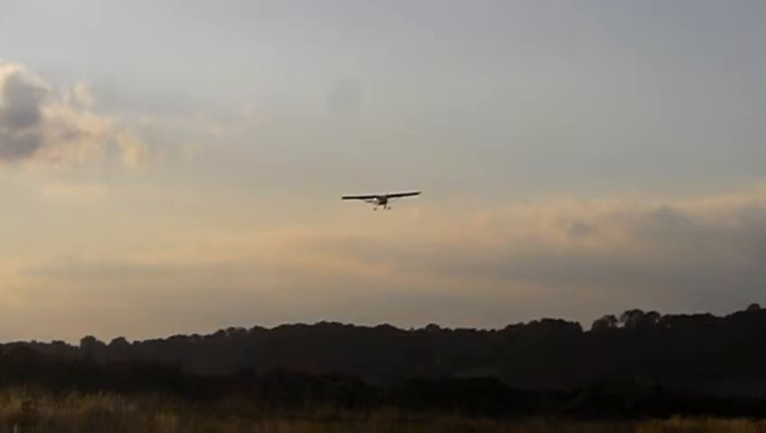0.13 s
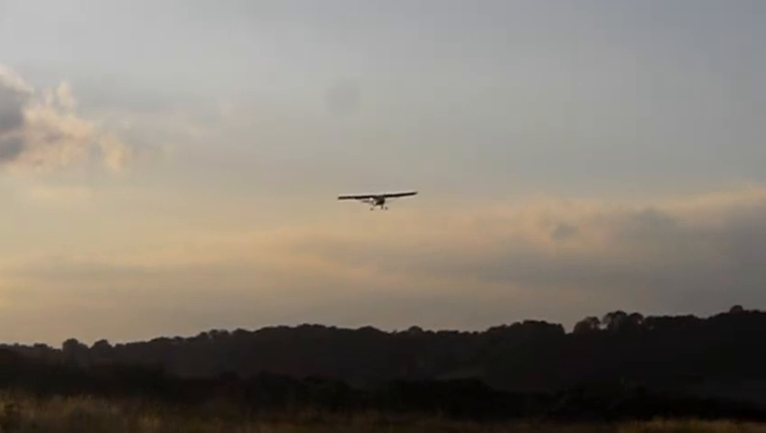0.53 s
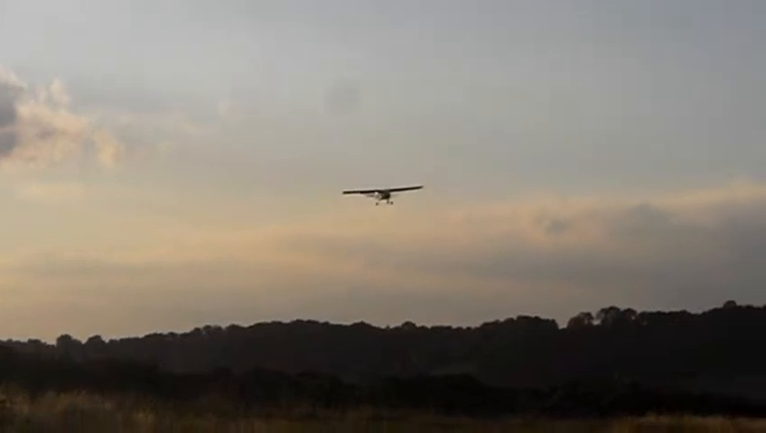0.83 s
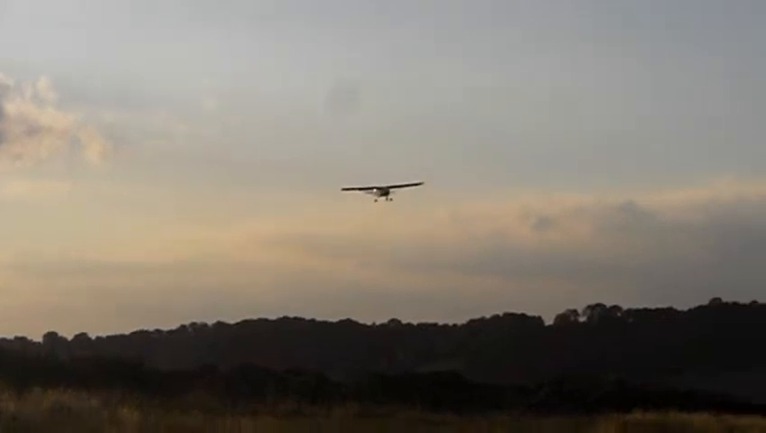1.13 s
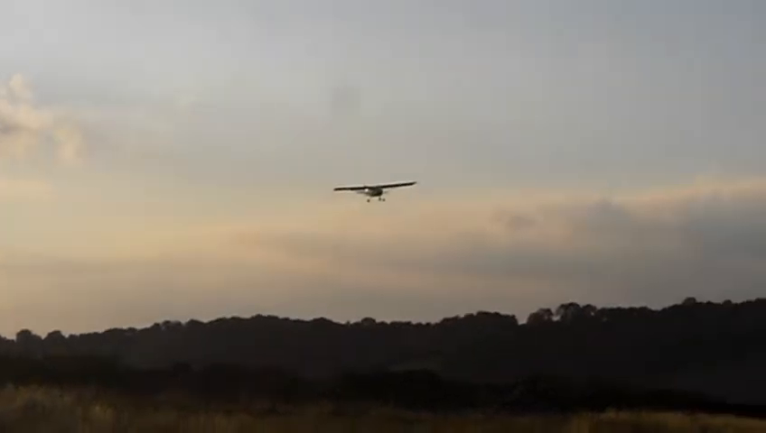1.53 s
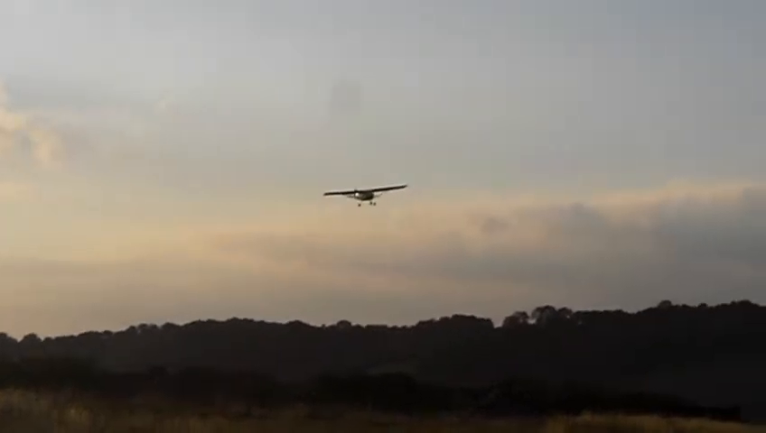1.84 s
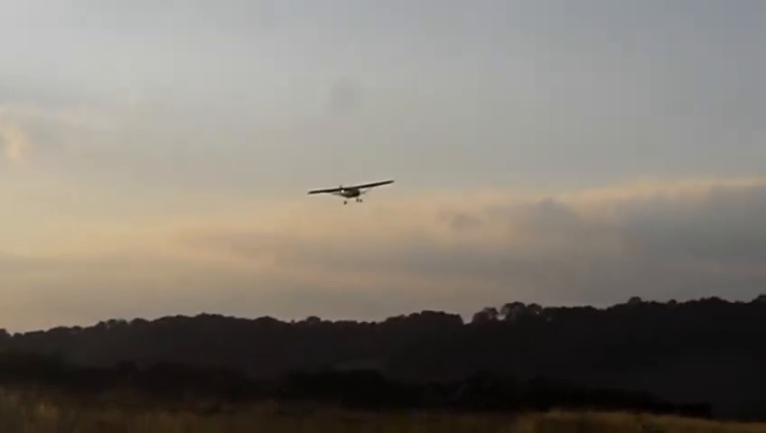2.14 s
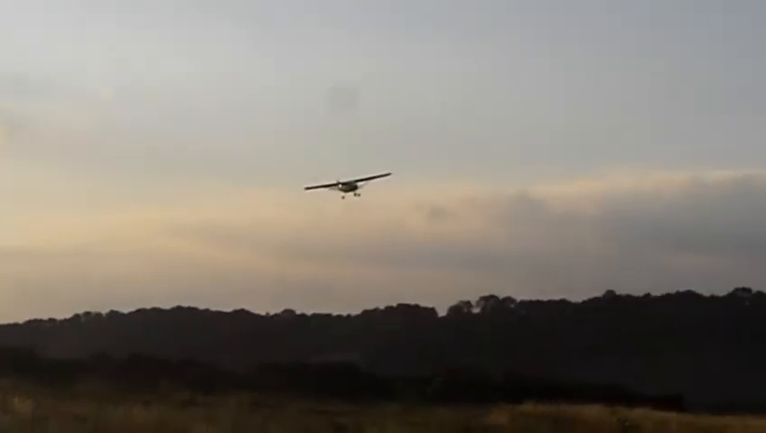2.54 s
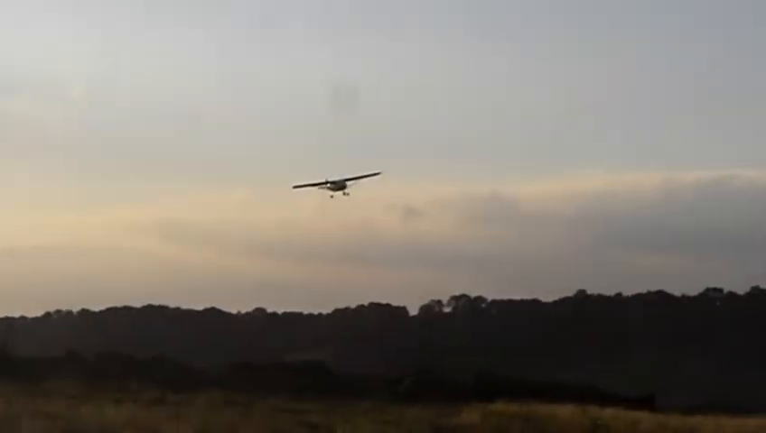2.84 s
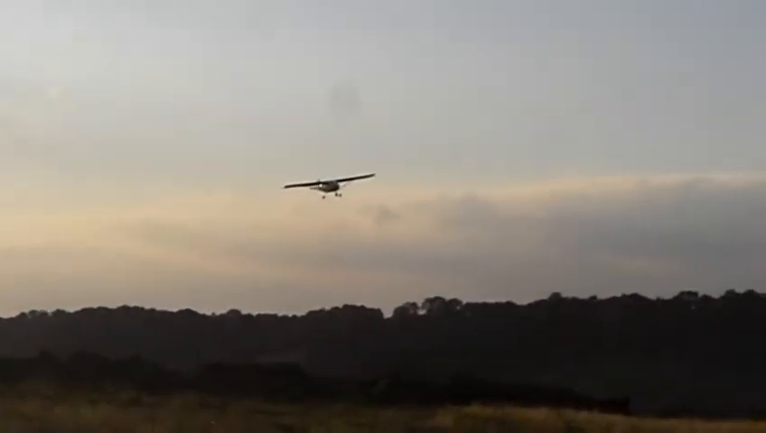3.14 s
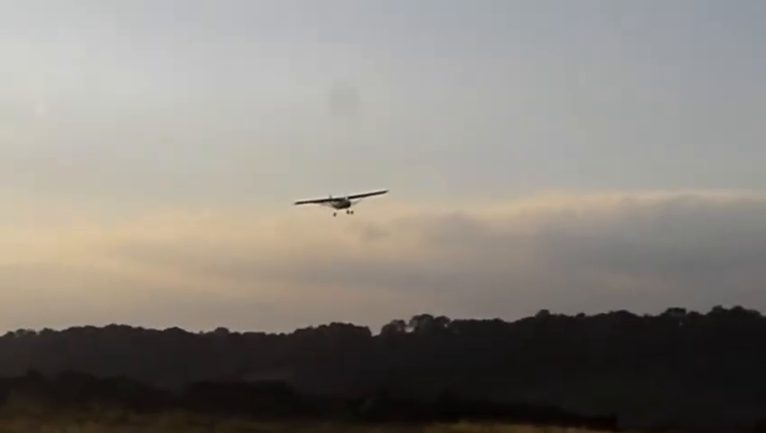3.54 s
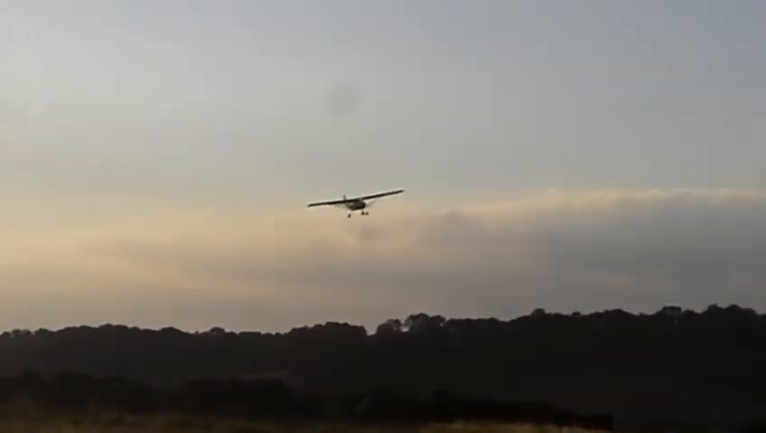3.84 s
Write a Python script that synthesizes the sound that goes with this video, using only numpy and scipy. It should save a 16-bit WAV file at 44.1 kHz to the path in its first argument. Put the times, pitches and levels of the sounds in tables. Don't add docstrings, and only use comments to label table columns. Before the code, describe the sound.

A small propeller plane drones over an open field. After 0.17 s of silence its raspy, buzzing engine and propeller hum fade in until 0.7 s, wavering in tone, swelling to loudest near 2.7 s. Pitch sags slightly at 3 s, then rises as the level eases. Low wind thumps hit the bare microphone around 0.3-0.9, 1.3-1.6, 2-2.7 and hardest 3.2-3.6 s, over breeze, hiss and faint insect ticks.

```python
import sys
import numpy as np
from scipy import signal
from scipy.fft import rfft, irfft
from scipy.io import wavfile
from scipy.ndimage import uniform_filter1d

SR = 44100
rng = np.random.default_rng(int(sys.argv[2]) if len(sys.argv) > 2 else 0)


def convert_level_to_amplitude(level_db):
    exponent = np.asarray(level_db, float) / 20
    return 10 ** exponent


def bounce(signal):
    frames = np.transpose(np.atleast_2d(signal))
    limited = np.clip(frames, -1, 1)
    pcm = np.round(limited * 32767).astype(np.int16)
    wavfile.write(sys.argv[1], SR, pcm)


N = 176400
T = np.arange(N) / SR

# (time [s], pitch of the 49th order of the engine cycle [Hz])
ENGINE_SPEED = [
    (.3, 1634),
    (.8, 1633),
    (1.5, 1633),
    (2.0, 1637),
    (2.6, 1633),
    (3.0, 1626),
    (3.55, 1642),
    (4.0, 1645),
]
# (time [s], level at the listener [dB])
FLIGHT_LEVEL = [
    (.3, -42),
    (.9, -46),
    (1.5, -44.5),
    (1.9, -42),
    (2.3, -38.5),
    (2.75, -38),
    (3.05, -42.5),
    (3.5, -41.5),
    (4.0, -44),
]
# (centre [Hz], width [Hz], even orders [dB], every second odd order [dB], noise [dB],
# level when facing away [dB])
PIPES = [(1055, 320, -13, -11, 15, -23), (1629, 145, -10, -3.5, -4, -7), (1935, 176, -1, 1.5, -4, -3.5),
         (3252, 293, -8, 0, 7, -1.5), (4010, 470, -14, 4, 8, -13), (1440, 170, 6, 3, 5, -5),
         (1767, 21, -14, 17, -18, -12), (1591, 30, 12, 0, -5, -23)]
# (outlet [index, rounded], level [dB], strongest at [s], length [s])
OUTLET_LOBES = [(0, 2.5, 1.55, 0.19), (0, 3, 2.89, 0.38), (0, 3, 3.91, 0.18), (1, 14.5, .97, 0.26),
                (1.5, 2, 3.73, 0.42), (1, -3.5, 2.32, .2), (1, 9, 1.81, 0.1), (1, 4, 2.86, 0.26),
                (2, 1, 1.06, 0.1), (2, 5, 2.16, 0.43), (2, 7.5, 4.23, 0.37), (2.5, -2, 1.5, 0.098),
                (3, 3, 2.77, 0.14), (3.5, -3.5, 2.16, 0.15), (4.5, -4, 1.61, 0.11), (4, -2.5, 2.77, 0.14),
                (5.5, 1.5, 1.71, 0.44), (5.5, -3.5, 3.66, 0.41), (7, 3, 1.72, 0.21), (6.5, 4.5, 2.7, 0.18),
                (7, 4.5, 2.73, 0.16), (2.5, -11, 0.27, 0.14), (3, -5, 1.06, 0.12)]
# (frequency [Hz], density [dB per Hz])
ROAR_SPECTRUM = [(250, -8.5), (700, -3), (1100, -5), (1750, -6), (2550, -12.5), (3290, -3.5), (4400, -16),
                 (6000, -44)]
# (multiple of blade rate [-], crank turns added [-], level [dB], strongest at [s], length [s])
BLADE_TONES = [(2, 0, 3, 2.28, 0.35), (2, 0, -5, 2.97, .25), (3, 0, -16, 0.44, .33), (4, 0, -3, .95, 0.32),
               (5, 0, -7, 1.9, .33), (6, 0, -1.5, 1.55, 0.71), (6, 1, -3.5, 1.15, 0.27),
               (7, 0, -1.5, 0.85, 0.56), (8, 0, -6, .8, 0.42), (10, 0, -2, 2.4, 0.37),
               (11, 0, -3.5, 3.01, 0.32), (11, 1, -5, 1.6, 0.35), (11, 1, -8, 3.1, .3),
               (11, 1, -6, 3.97, 0.22), (12, 0, -7, 2.7, .3), (12, 0, -6.5, 1.8, 0.42),
               (14, -1, -1.5, 1.62, 0.4), (14, -1, -4, 2.56, 0.18), (14, -1, -5.5, 3.8, 0.22),
               (14, 0, -4, 1.75, 0.51), (14, 0, -7, 2.9, .3), (16, 0, -4.5, 1.9, 0.23),
               (16, 0, -6.5, 3.69, 0.31), (17, 0, -5, 2.9, 0.43), (19, 0, -11.5, 0.77, 0.19),
               (6, 0, -2, 3.39, 0.37), (7, 0, -6, 2.83, .3)]
# (time [s], rumble level [dB])
GUST_LEVEL = [(0.2, -70), (0.37, -47), (0.43, -40), (0.75, -39), (0.94, -44), (1.09, -50), (1.3, -44),
              (1.46, -36.5), (1.81, -42), (2.08, -40.5), (2.25, -37), (2.55, -35.5), (2.78, -42),
              (2.93, -52), (3.19, -48), (3.34, -42.5), (3.83, -42.5), (4.0, -36)]
# (frequency [Hz], density [dB per Hz])
RUMBLE_SPECTRUM = [(15, 2), (40, 6.5), (100, -7), (200, -16), (350, -20), (500, -18.5), (1200, -54)]
# (frequency [Hz], density [dB per Hz])
BREEZE_SPECTRUM = [(20, -6), (60, 2), (130, -3), (250, -8.5), (450, -11), (800, -27)]
# (time [s], peak [dB], frequency [Hz])
THUMPS_SUCK = [(0.276, -21, 297), (0.294, -14.5, 210), (0.327, -15, 150), (0.351, -20.5, 144),
               (0.375, -17.5, 260), (0.59, -14, 185), (0.607, -24, 113), (0.617, -15.5, 159),
               (0.646, -11.5, 210), (0.663, -12, 245), (0.675, -19, 119), (0.729, -14, 140),
               (0.807, -23, 104), (0.905, -23.5, 121), (1.304, -21, 144), (1.318, -10.5, 156),
               (1.344, -24, 138), (1.387, -19.5, 114), (1.408, -19.5, 138), (1.425, -20, 123),
               (1.529, -20.5, 148), (1.592, -20, 144),
               (2.07, -23, 181), (2.119, -15, 126), (2.176, -9, 118), (2.305, -19.5, 283),
               (2.324, -16, 186), (2.354, -16, 120), (2.398, -18, 116.6), (2.424, -14, 151),
               (2.466, -19.5, 194), (2.535, -19, 122), (2.642, -18.5, 128), (2.659, -20, 135),
               (3.242, -16.5, 154), (3.272, -8.5, 196), (3.292, -13, 169), (3.31, -10.5, 186),
               (3.328, -8, 248), (3.347, -21.5, 103), (3.515, -39, 132), (3.54, -8.5, 241),
               (3.625, -13.5, 135), (3.797, -14.5, 97), (3.819, -19, 210), (3.846, -23, 112),
               (3.904, -21, 168), (3.973, -20.5, 88),
               (0.218, -30.5, 152),
    (.281, -14, 274),
    (3.276, -13, 205),
    (3.316, -7.5, 167),
    (3.3, -13, 290),
    (3.529, -16, 293),
               (.237, -28, 127), (.256, -23, 140), (.312, -24, 170), (.34, -17, 150), (.362, -26, 150),
                (.57, -23, 90.5), (.635, -21.5, 150), (2.014, -29, 109), (2.047, -22, 120),
                (2.132, -21, 80), (2.275, -27, 111), (2.335, -22, 150), (2.375, -22, 120),
                (2.584, -23.5, 110), (1.721, -26.5, 131), (1.76, -29.5, 111), (1.799, -25.5, 120),
                (2.721, -25, 91), (3.262, -20, 100)]
# (time [s], peak [dB], frequency [Hz])
THUMPS_PUSH = [
    (.387, -12.5, 171),
    (.621, -12, 161),
    (.694, -15.5, 116),
    (2.18, -10.5, 153),
    (2.087, -17.5, 194),
    (2.103, -17, 187),
    (2.342, -11.5, 142),
    (2.449, -17.5, 150),
]
# (frequency [Hz], density [dB per Hz])
HISS_SPECTRUM = [(300, 14), (2000, 15), (5500, 0), (8000, -3), (10300, -0.5), (12500, -0.5), (14500, -5),
                 (16300, -8)]

ENGINE_ORDER, BLADES_PER_CYCLE = 49, 2.576
JITTER_CYCLES, SMEAR_RAD = 0.0005, 0.09
PUFF_LOW, PUFF_HIGH, SHARP_HZ = 0.25, 0.33, 2500
ROAR_DB, ROAR_GATE = 1.5, 0.4
BLADE_DB, OFF_LOBE_DB, BLADE_FADE_DB = -44, -16, 1
SHIMMER_DB = 1.0
THUMP_CYCLES, THUMP_SKEW_RAD, EDGE_DB, EDGE_HZ = 0.3, 0.44, -1, 390
LUMPS_DB, FLUTTER_DB, FLUTTER_S, BREEZE_DB = 2.5, -16.5, 0.012, -48.5
HISS_DB, HISS_FOLLOWS, HISS_FADE = -47.5, 0.22, 0.74
CRICKET_DB, CRICKET_HZ = -73, 10250
START_S, FADE_END_S, FADE_FROM_DB = 0.172, 0.66, -15.5
MIC_LOW_HZ, CUTOFF_HZ = 40, 15900


def rms_one(x):
    return x / np.sqrt(np.mean(x ** 2) + 1e-20)


def in_time(rows):
    time_s, value = np.transpose(rows)
    return np.interp(T, time_s, value)


def bell(t, length_s):
    return np.exp(-0.5 * (t / length_s) ** 2)


def drift(rate_hz):
    r = np.exp(-80 * np.pi * rate_hz / SR)
    draws = rng.standard_normal(N // 40 + 2002)
    slow = rms_one(signal.lfilter([1], [1, -2 * r, r * r], draws)[2000:])
    return np.interp(np.arange(N) / 40, np.arange(len(slow)), slow)


def coloured(spectrum):
    hz, db = np.transpose(spectrum)
    log_hz = np.log(np.arange(1, N // 2 + 2) * SR / N)
    gain = convert_level_to_amplitude(np.interp(log_hz, np.log(hz), db, right=-120))
    return rms_one(irfft(rfft(rng.standard_normal(N)) * gain, N))


def resonate(x, hz, width_hz):
    r = np.exp(-np.pi * width_hz / SR)
    poles = [1, -2 * r * np.cos(2 * np.pi * hz / SR), r * r]
    return signal.lfilter([(1 - r * r) / 2, 0, (r * r - 1) / 2], poles, x)


def ring(x, hz, width_hz, second_width_hz):
    return rms_one(resonate(resonate(x, hz, width_hz), hz, second_width_hz))


def exhaust(cycles):
    order = np.arange(1025)
    audible = (order > 0) * (order < 200)
    smear = np.exp(1j * SMEAR_RAD * order ** 2)
    position = (cycles + JITTER_CYCLES * drift(36)) % 1 * 2048
    out = 0
    for pipe, (hz, width_hz, even_db, third_db, noise_db, aside_db) in enumerate(PIPES):
        order_db = np.choose(order % 4, [even_db, 0, even_db, third_db])
        cycle = irfft(convert_level_to_amplitude(order_db) * audible * smear)
        beats = np.interp(position, np.arange(2049), np.append(cycle, cycle[0]))
        sharpness = PUFF_HIGH if hz > SHARP_HZ else PUFF_LOW
        gate = np.exp(sharpness * np.cos(4 * np.pi * cycles - 0.3))
        beats = ring(beats, hz, width_hz, 2 * width_hz)
        noise = ring(gate * rng.standard_normal(N), hz, width_hz, 2 * width_hz)
        facing = convert_level_to_amplitude(aside_db)
        for outlet, db, peak_s, length_s in OUTLET_LOBES:
            if round(outlet) == pipe:
                facing = facing + convert_level_to_amplitude(db) * bell(T - peak_s, length_s)
        out = out + facing * rms_one(beats + convert_level_to_amplitude(noise_db) * noise)
    puff = np.cos(4 * np.pi * cycles - 0.5) + 0.28 * np.cos(8 * np.pi * cycles - 1)
    return out + convert_level_to_amplitude(ROAR_DB) * (1 + ROAR_GATE * puff) * coloured(ROAR_SPECTRUM)


def propeller(cycles):
    out = 0
    for multiple, crank, db, peak_s, length_s in BLADE_TONES:
        lobe_db = OFF_LOBE_DB * (1 - bell(T - peak_s, length_s))
        per_cycle = round(multiple) * BLADES_PER_CYCLE + 2 * round(crank)
        phase = 2 * np.pi * cycles * per_cycle + 0.059 * multiple * drift(11.0)
        level_db = BLADE_DB + db + lobe_db + BLADE_FADE_DB * drift(8.2)
        out = out + convert_level_to_amplitude(level_db) * np.sin(phase + rng.uniform(0, 6.58))
    return out


def through_air(x):
    edges_hz = 200 * 2 ** np.arange(0, 5.4, 1 / 3)
    out = 0
    for low, high in zip(edges_hz, edges_hz[1:]):
        band = signal.sosfilt(signal.butter(2, [low, high], "band", fs=SR, output="sos"), x)
        out = out + band * convert_level_to_amplitude(SHIMMER_DB * (drift(1.09) + 0.44 * drift(3.7)))
    return convert_level_to_amplitude(in_time(FLIGHT_LEVEL)) * out


def pulse(t, hz, phase_rad=0):
    return bell(t * hz, THUMP_CYCLES) * np.cos(2 * np.pi * hz * t + phase_rad)


def wind():
    suck = np.array(THUMPS_SUCK)
    rows = np.vstack([suck, THUMPS_PUSH])
    signs = np.where(np.arange(len(rows)) < len(suck), -1, 1)
    skews = rng.uniform(-1.1, 1, len(rows))
    thumps, stir = np.zeros(N), np.zeros(N)
    for (time_s, db, hz), sign, skew in zip(rows, signs, skews):
        near = slice(int((time_s - 0.1) * SR), int((time_s + 0.1) * SR))
        t = T[near] - time_s
        thumps[near] += sign * convert_level_to_amplitude(db) * pulse(t, hz, THUMP_SKEW_RAD * skew)
        thumps[near] += sign * convert_level_to_amplitude(2 * db + EDGE_DB) * pulse(t, EDGE_HZ)
        stir[near] += convert_level_to_amplitude(2 * db) * bell(t, FLUTTER_S)
    rumble = convert_level_to_amplitude(in_time(GUST_LEVEL) + 4.0 + LUMPS_DB * drift(5.7)) * coloured(RUMBLE_SPECTRUM)
    flutter_noise = coloured([(30, 3.5), (110, 8.5), (260, -5.0), (450, -10.0), (800, -49.0)])
    flutter = convert_level_to_amplitude(FLUTTER_DB + 2 * drift(51)) * np.sqrt(stir) * flutter_noise
    breeze = convert_level_to_amplitude(BREEZE_DB + 2.0 * drift(6.7)) * coloured(BREEZE_SPECTRUM)
    return thumps + rumble + flutter + breeze * np.clip((T - START_S) / 0.3, 0, 1)


def field():
    ticks = (rng.random(N) < 14.0 / SR) * convert_level_to_amplitude(2.3 * rng.standard_normal(N))
    bursts = uniform_filter1d(ticks, size=300) * rng.standard_normal(N)
    insects = convert_level_to_amplitude(CRICKET_DB) * ring(bursts + 1e-18, CRICKET_HZ, 1100, 900)
    level_db = in_time(FLIGHT_LEVEL)
    hiss_db = HISS_DB + HISS_FOLLOWS * (level_db - level_db.mean())
    return convert_level_to_amplitude(hiss_db) * coloured(HISS_SPECTRUM) + insects


def scene():
    cycles = np.cumsum(in_time(ENGINE_SPEED) / ENGINE_ORDER) / SR
    started = T > START_S
    ramp = np.clip((T - START_S) / (FADE_END_S - START_S), 0, 1)
    fade = started * (convert_level_to_amplitude(FADE_FROM_DB) + (1 - convert_level_to_amplitude(FADE_FROM_DB)) * ramp)
    aircraft = through_air(exhaust(cycles)) + propeller(cycles)
    return (fade * aircraft + fade ** HISS_FADE * field() + started * wind())[None]


def band_limit(x):
    return signal.sosfilt(signal.butter(12, 15810, fs=SR, output="sos"), x)


def record(dry):
    low_cut = signal.butter(2, MIC_LOW_HZ, "high", fs=SR, output="sos")
    top_cut = signal.cheby2(20, 60, CUTOFF_HZ, fs=SR, output="sos")
    mix = signal.sosfilt(np.vstack([low_cut, top_cut]), np.tanh(dry))
    return band_limit(mix)


dry = scene()
out = record(dry)
bounce(out)
```